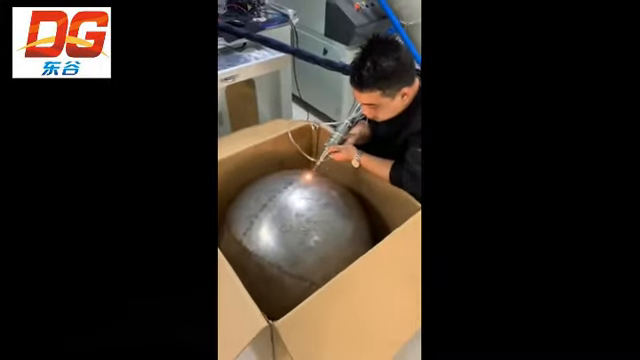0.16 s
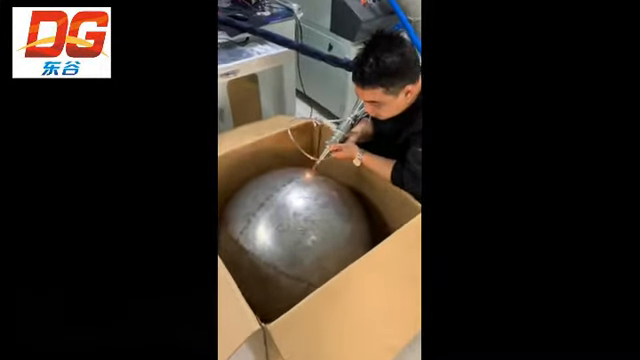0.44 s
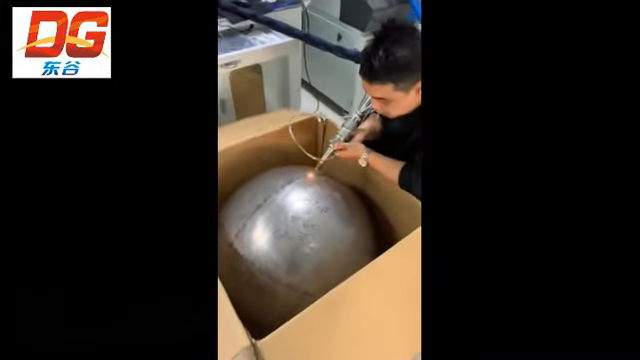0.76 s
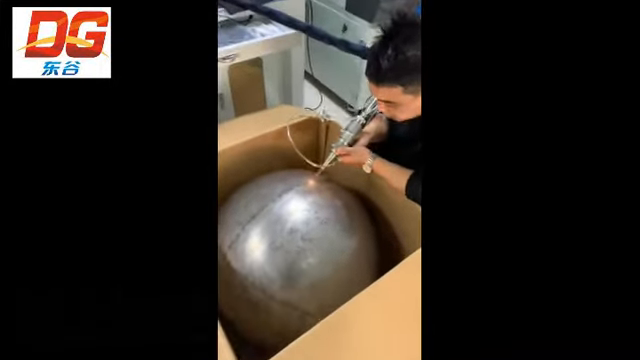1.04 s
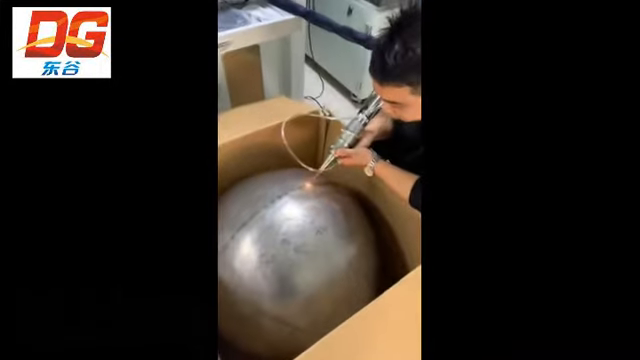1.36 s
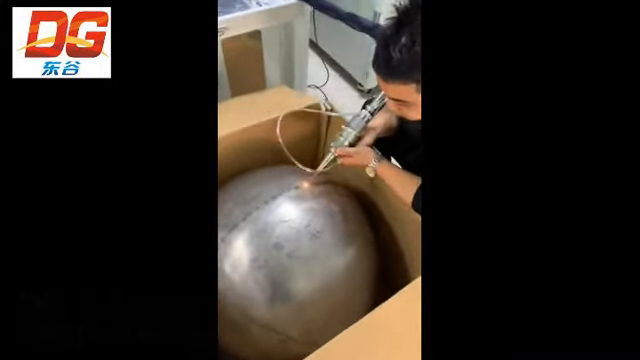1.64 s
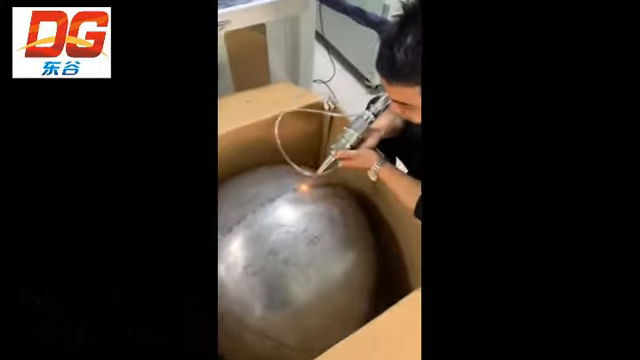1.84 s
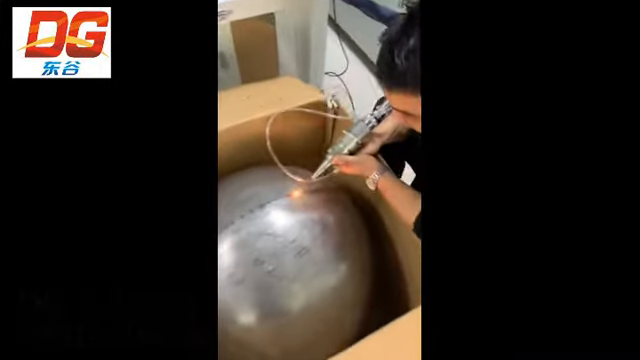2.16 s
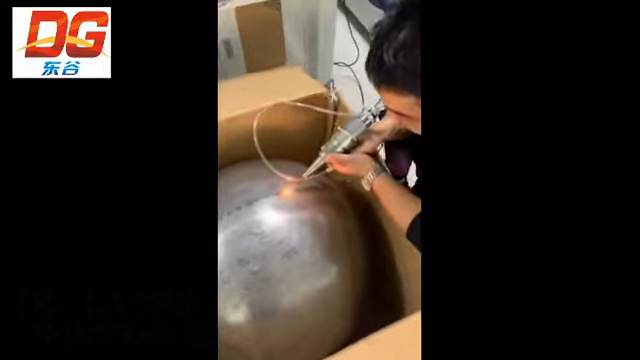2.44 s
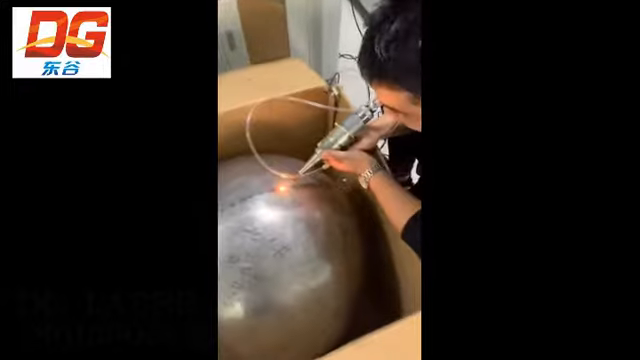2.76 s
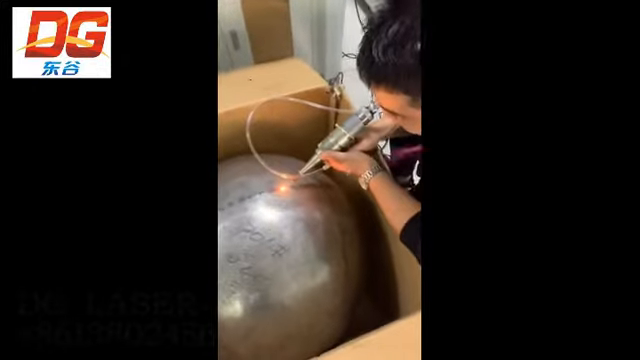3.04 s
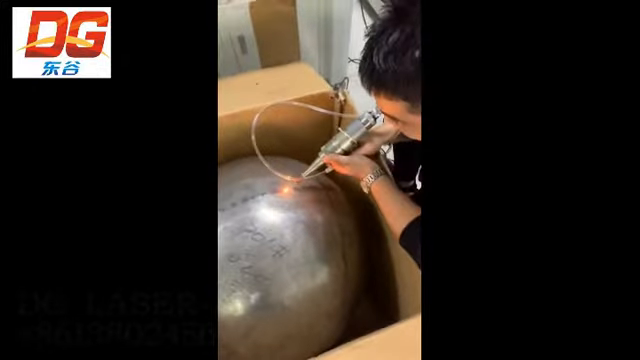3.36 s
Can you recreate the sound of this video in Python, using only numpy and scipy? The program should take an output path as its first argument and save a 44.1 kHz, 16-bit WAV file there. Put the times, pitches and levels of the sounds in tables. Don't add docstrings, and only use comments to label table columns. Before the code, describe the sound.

Continuous bassy machine fan noise with wavering motor hum and faint fluttering gas hiss. A sharp tick comes early, a bright air burst dulls midway, another tick later; indoor hall, phone stereo with mono bass.

```python
import sys
import numpy as np
from scipy import signal
from scipy.fft import rfft, irfft
from scipy.io import wavfile
from scipy.ndimage import uniform_filter1d

SR = 44100
rng = np.random.default_rng(int(sys.argv[2]) if len(sys.argv) > 2 else 0)


def gain_from_db(level_db):
    decades = np.asarray(level_db, float) / 20
    return 10 ** decades


def inscribe(sig):
    pcm = np.round(np.clip(np.atleast_2d(sig).T, -1, 1) * 32767)
    wavfile.write(sys.argv[1], SR, pcm.astype(np.int16))


N = 154791

# frequency in Hz, level in dB per Hz.
FAN_COLOUR = [(25, -16), (45, -6.5), (124, -13), (294, -13.5), (456, -21), (900, -22), (2000, -30.5),
              (3900, -37)]
# frequency in Hz, level in dB, width in Hz.
FAN_HUMS = [(100.4, -51.5, 5), (126.2, -51.5, 4.4), (150.3, -52, 7.3), (249.3, -59.5, 9.1),
            (396.2, -57.5, 6), (429.7, -55.5, 16), (486.2, -57.5, 27), (834, -58.5, 37)]
# frequency in Hz, level in dB, wander in Hz, flicker in dB.
MOTOR_LINES = [(70.93, -47, 0.94, -0.5), (293, -52, 1.5, 3.5)]
# time in seconds, frequency in Hz, level in dB.
BLADE_TONE = [(0.0, 201.4, -46.5), (0.09, 201.0, -50), (0.25, 211.8, -50.5), (0.43, 201.0, -52.5),
              (0.61, 210.9, -51), (1.28, 209.0, -45), (1.45, 206.5, -57), (1.52, 215.6, -54),
              (1.72, 211.0, -60.5), (1.73, 209.2, -44.5), (2.23, 206.3, -52), (2.36, 209.8, -49),
              (2.95, 207.2, -51.5), (3.5, 209.4, -48)]
# time in seconds, frequency in Hz, level in dB.
COMPRESSOR_DRONE = [(0.0, 49.2, -50), (0.03, 49.1, -43), (0.24, 49.3, -51), (0.4, 47.44, -45.5),
                    (1.14, 48.8, -41.5), (1.35, 48.13, -41.5), (1.45, 44.24, -47), (2.3, 49.04, -47),
                    (2.84, 49.16, -40.5), (3.01, 49.1, -55), (3.15, 49.3, -42.5), (3.24, 45.5, -47),
                    (3.31, 48.5, -51), (3.5, 48.9, -34)]
# frequency in Hz, level in dB per Hz.
GAS_COLOUR = [(900, -15), (1800, -3.5), (2600, -2), (3100, -3.5), (4300, -2.5), (5000, -1.5), (6500, -5.5),
              (7800, -7.5)]
# frequency in Hz, level in dB, width in Hz.
NOZZLE_WHISTLES = [(2575, -60, 70), (3575, -65, 100), (3810, -65, 70), (5020, -66, 50), (5800, -61, 250),
                   (7560, -59, 90)]
# centre in seconds, level in dB, pitch in Hz, length in seconds,
# lag between the ports in seconds.
SOFT_KNOCKS = [
    (0.249, -42, 1860, 0.011, 0.000011),
    (0.366, -46, 3420, 0.017, -.00008),
    (0.521, -50.5, 1820, 0.0071, 0.000024),
    (1.143, -56.5, 5900, .01, 0.0081),
    (2.052, -47.5, 1430, 0.029, .00005),
    (2.268, -48.5, 890, 0.024, .00003),
    (2.316, -39, 3500, 0.0068, -.00008),
    (2.867, -46, 2470, 0.018, 0.016),
    (3.279, -48.5, 1736, 0.018, 0.000012),
]
# start in seconds, peak in dB, ring in Hz, time to fall 60 dB in seconds,
# lag of the right port in seconds.
METAL_TICKS = [
    (.2530, -33, 2600, .003, 0),
    (.2557, -33, 2400, .003, 0),
    (.2592, -33, 2400, .004, 0),
    (.3575, -27, 3600, .012, -.0001),
    (.3608, -16, 3050, .005, -.00011),
    (.3655, -31, 3340, .04, -.0001),
    (2.3126, -32, 2900, .004, -.00012),
    (2.3143, -18.5, 2600, .0025, -.00011),
    (2.3135, -36, 5950, .03, -.00014),
]
# time in seconds, level in dB, dullness from 0 to 1.
AIR_RELEASE = [
    (1.372, -62, .05),
    (1.39, -38.5, .1),
    (1.46, -39, .33),
    (1.53, -38.5, .55),
    (1.62, -40.5, .65),
    (1.74, -42, .75),
    (1.88, -47.5, .85),
    (2.1, -50, .85),
    (2.35, -62, .85),
]
# frequency in Hz, delay of the right in radians,
# diffuse share from 0 to 1.
PORT_PATHS = [(900, -.2, .68), (1720, .1, .36), (2500, 1.1, .6), (3700, 1.5, .4), (4400, 2.7, .55),
              (5000, 3.15, .3), (5900, 4.8, .55), (6700, 6.2, .4), (7600, 6.8, .45)]
# start in seconds, end in seconds.
THIN_STRETCHES = [(0, .085), (.16, .19), (.28, .32), (.44, .49), (.58, .7), (.84, .88), (1.22, 1.27),
                  (1.62, 1.69), (1.77, 1.81), (1.93, 2.03), (2.17, 2.38), (2.45, 2.51), (2.6, 2.64),
                  (2.74, 2.77), (2.82, 3.12), (3.35, 3.5)]

HZ = np.arange(N // 2 + 1) * SR / N + 1e-9
FRAMES = dict(window="cosine", nperseg=2048)


def walk(rate):
    hold = int(SR / rate)
    steps = np.repeat(rng.standard_normal(N // hold + 1), hold)
    return 1.3 * uniform_filter1d(uniform_filter1d(steps, hold), hold)[:N]


def colour(table):
    hz, db = np.array(table, float).T
    return gain_from_db(np.interp(np.log(HZ), np.log(hz), db, left=-99))


def bell(hz, octaves):
    return np.exp(-.5 * (np.log2(HZ / hz) / octaves) ** 2)


def ports(gain, diffuse=None, lag_s=0.):
    parts = rng.standard_normal((6, len(HZ)))
    noise = parts[:3] + 1j * parts[3:]
    if diffuse is None:
        hz, turn, share = np.array(PORT_PATHS).T
        turn, share = np.interp(HZ, hz, turn), np.interp(HZ, hz, share)
    else:
        turn, share = 2 * np.pi * HZ * lag_s, diffuse
    share = np.clip(share, 0, 1)
    late = np.array([np.ones(len(HZ)), np.exp(-1j * turn)])
    both = (np.sqrt(1 - share) * noise[0] * late + np.sqrt(share) * noise[1:]) * gain
    return irfft(both, N) * N / np.sqrt(4 * np.sum(gain ** 2))


def flow(gain, swell_db, flicker_db, rate):
    out = 0
    swell = swell_db * walk(rate)
    both = rfft(ports(gain))
    for octave in np.arange(0, 9, .5):
        band = np.cos(np.pi * np.clip(np.log2(HZ / 24) - octave, -.5, .5)) ** 2
        out = out + irfft(both * band, N) * gain_from_db(swell + flicker_db * walk(2 * rate))
    return out


def tones(table, flicker_db):
    out = 0
    for hz, db, width in table:
        resonance = 1 / (1 + (2 * (HZ - hz) / width) ** 2)
        out = out + gain_from_db(db + flicker_db * walk(7.7)) * ports(resonance)
    return out


def line(hz, db):
    return np.sqrt(2) * gain_from_db(db) * np.sin(2 * np.pi * np.cumsum(hz) / SR)


def machine_tones(t):
    out = 0
    for table in (BLADE_TONE, COMPRESSOR_DRONE):
        s, hz, db = np.array(table).T
        out = out + line(np.interp(t, s, hz) + walk(8), np.interp(t, s, db))
    for hz, db, wander_hz, flicker_db in MOTOR_LINES:
        out = out + line(hz + wander_hz * walk(4), db + flicker_db * walk(4.94))
    return out


def fans(t):
    rush = gain_from_db(-39.5) * flow(colour(FAN_COLOUR), swell_db=0.3, flicker_db=2, rate=2.763)
    return rush + tones(FAN_HUMS, flicker_db=0.97) + machine_tones(t)


def knocks(t):
    out = 0
    for s, db, hz, length, lag_s in SOFT_KNOCKS:
        tail = gain_from_db(-8) * (t > s) * np.exp(-np.abs(t - s) / .03)
        shape = np.exp(-.5 * ((t - s) / length) ** 2) + tail
        out = out + gain_from_db(db) * shape * ports(bell(hz, octaves=1.0), 0.039, lag_s)
    return out


def ticks(t):
    rise_s = .0002
    out = 0
    for s, db, hz, t60, lag_s in METAL_TICKS:
        age = np.clip(t - s - np.array([[0], [lag_s]]), 0, 1)
        level = gain_from_db(db - 60 * age / t60) * (1 - np.exp(-age / rise_s))
        out = out + level * np.sin(2 * np.pi * hz * age)
    return out


def air_release(t):
    s, db, dull = np.array(AIR_RELEASE).T
    dull = np.clip(np.interp(t, s, dull), 0, 1)
    level = gain_from_db(np.interp(t, s, db, left=-99, right=-99))
    patchy_db = 2.4
    bright_colour = bell(3000, octaves=1.05) / (1 + (HZ / 6800) ** 6)
    crackle = gain_from_db(2.5 * walk(900))
    bright = flow(bright_colour, .4, patchy_db, 45.) * crackle
    low = flow(bell(650, octaves=1.3), 1., patchy_db, 25.)
    return level * (np.sqrt(1 - dull) * bright + np.sqrt(dull) * low)


def gas_jet():
    hiss = gain_from_db(-47) * flow(colour(GAS_COLOUR), swell_db=1.0, flicker_db=1.2, rate=5.6)
    return hiss + tones(NOZZLE_WHISTLES, flicker_db=2.5)


def hall(x):
    ripple_db, ripple_bins, ripple_frames = 2.5, 4, 4
    f, _, z = signal.stft(x, SR, **FRAMES)
    ripple = uniform_filter1d(rng.standard_normal(z.shape[1:]), size=ripple_bins, axis=0)
    ripple = uniform_filter1d(ripple, size=ripple_frames)
    gain = gain_from_db(ripple_db * ripple / ripple.std() * np.clip(f / 1000, 0, 1)[:, None])
    gain = gain / np.sqrt(np.mean(gain ** 2, axis=1, keepdims=True))
    return signal.istft(z * gain, SR, **FRAMES)[1][:, :N]


def scene():
    t = np.arange(N) / SR
    return hall(fans(t) + gas_jet() + air_release(t)) + knocks(t) + ticks(t)


def thin_out(pair):
    scatter_db = 2
    f, s, z = signal.stft(pair, SR, **FRAMES)
    band = np.unique((np.log(f + 300) / .05).astype(int), return_inverse=True)[1]
    edges = np.flatnonzero(np.diff(band, prepend=-1))
    band_hz = f[edges, None]
    line_power = np.abs(z) ** 2
    power = np.add.reduceat(line_power, edges, axis=1) / np.bincount(band)[:, None] + 1e-30

    uneven = power * gain_from_db(scatter_db * rng.standard_normal(power.shape[2]))
    under = 10 * np.log10(uneven / np.median(uneven, axis=2, keepdims=True)[::-1])
    under = under + scatter_db * rng.standard_normal(power.shape)

    frame = np.arange(len(s)) % (N // 1024)
    wander = np.clip(.5 + .9 * walk(40)[::1024][frame], 0, 2)
    slope = np.clip(band_hz / 1000 - 6, 0, 1)
    extra = np.where(band_hz < 7400, 2, 1)
    under[1] -= 5.5 * (slope * wander * extra - .1)

    thin = sum((s > start) & (s < end) for start, end in THIN_STRETCHES)
    under[0] -= np.where(thin, 15, -2) * np.exp(-((band_hz - 4740) / 300) ** 2)

    weak = line_power < gain_from_db(2 * -7.5) * power.max(axis=0)[band]
    muted = ((under < -7.5)[:, band] | weak) & (f > 1000)[:, None]
    return signal.istft(z * np.where(muted, gain_from_db(-35), 1), SR, **FRAMES)[1][:, :N]


def low_pass(x):
    return signal.sosfilt(signal.butter(12, 8220, fs=SR, output="sos"), x)


def record(dry):
    mono_below_hz, top_hz = 365, 7660
    mid = rfft(dry[0] + dry[1]) / 2
    side = rfft(dry[0] - dry[1]) / 2
    side = side / (1 + (mono_below_hz / HZ) ** 7)
    mid, side = thin_out(irfft(np.array([mid, side]) * (HZ < top_hz), N))
    return low_pass(np.array([mid + side, mid - side]))


dry = scene()
out = record(dry)
inscribe(out)
```